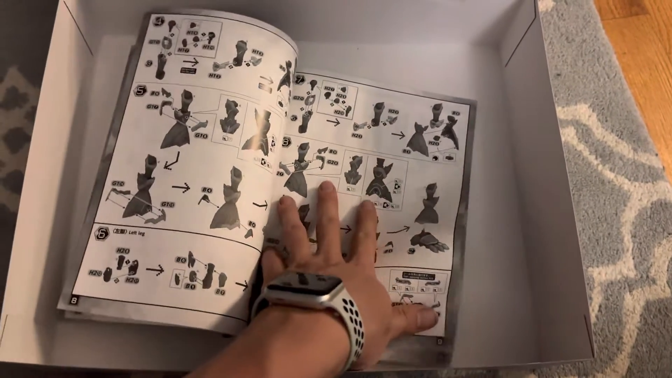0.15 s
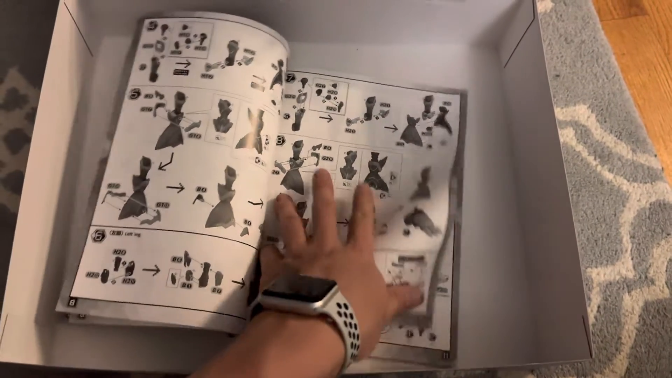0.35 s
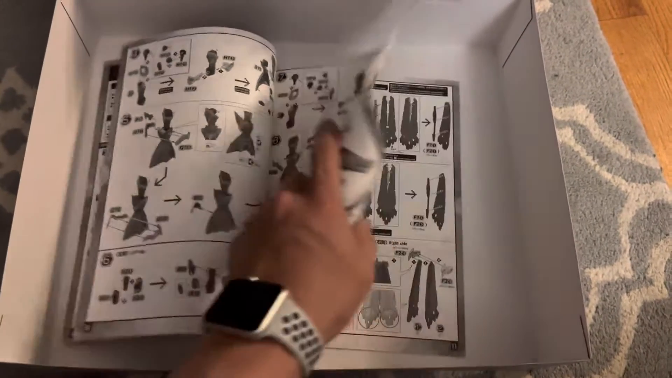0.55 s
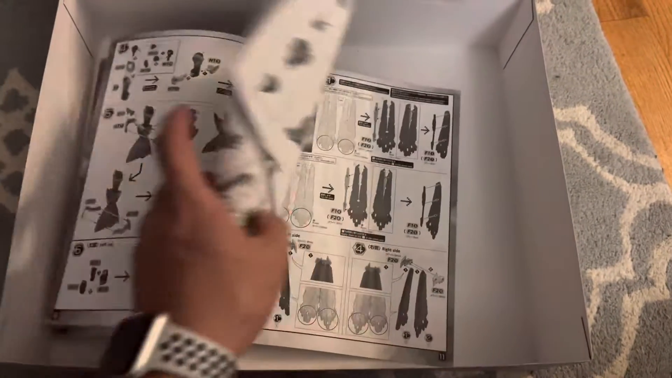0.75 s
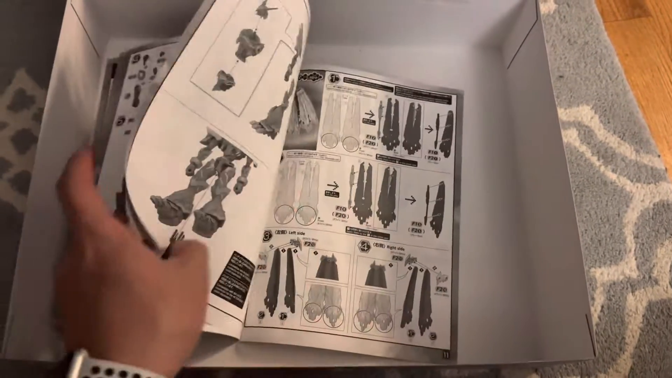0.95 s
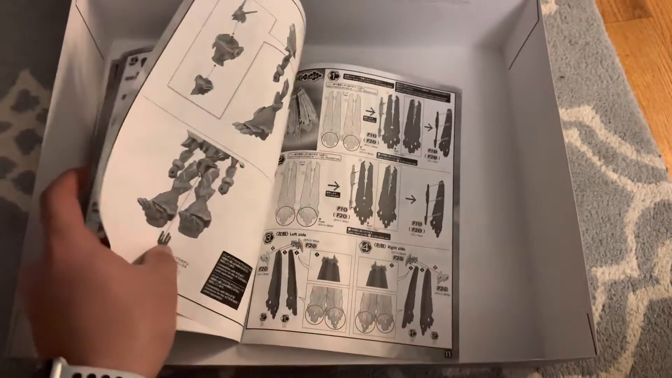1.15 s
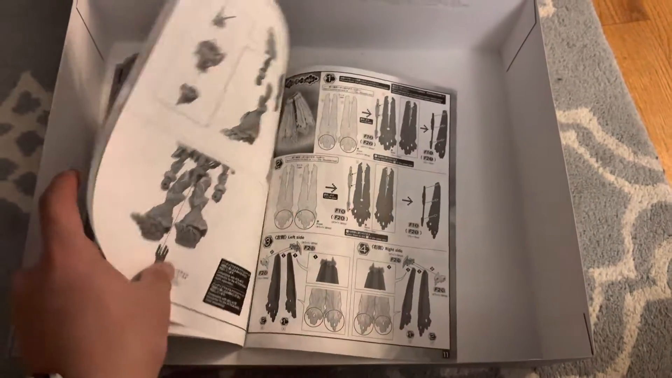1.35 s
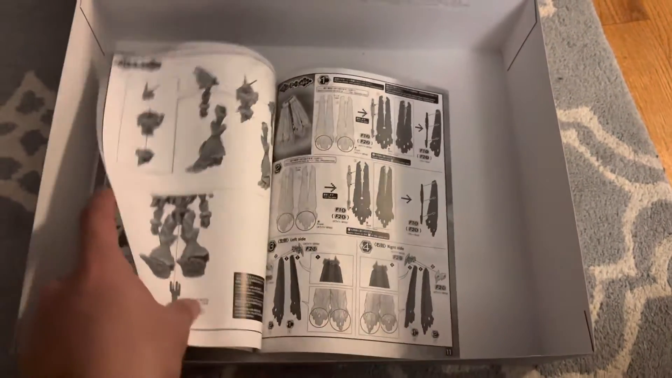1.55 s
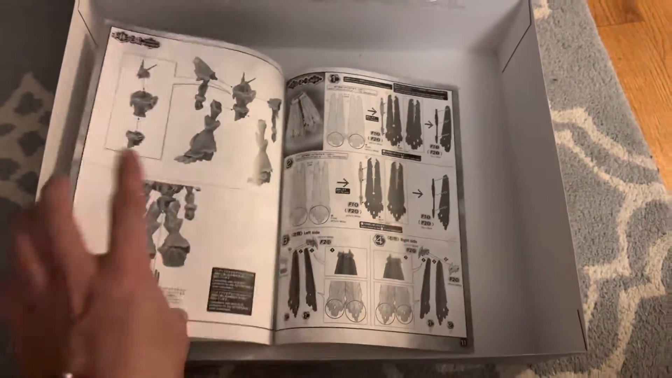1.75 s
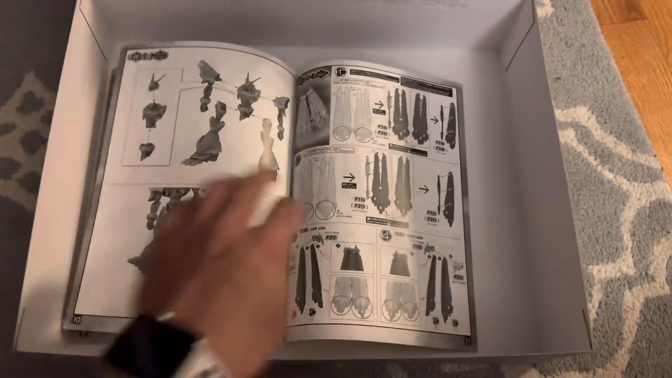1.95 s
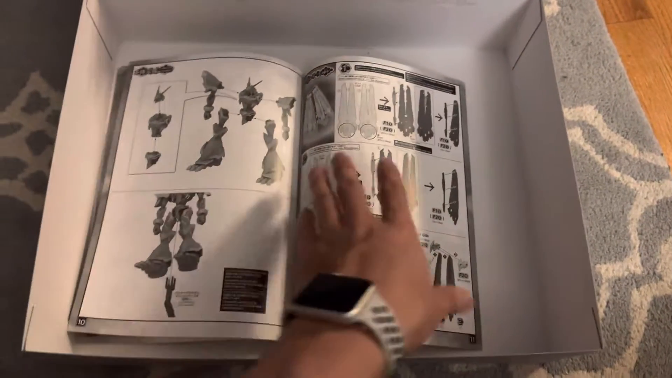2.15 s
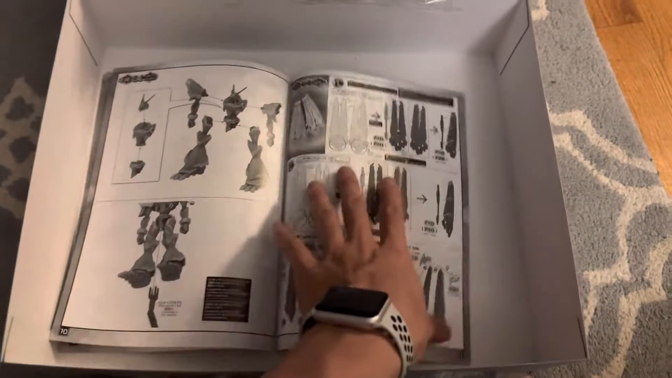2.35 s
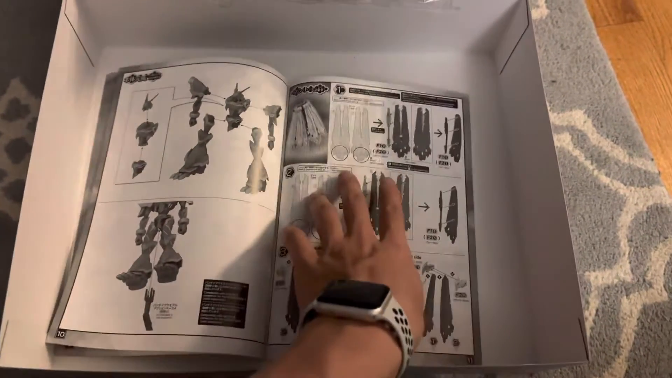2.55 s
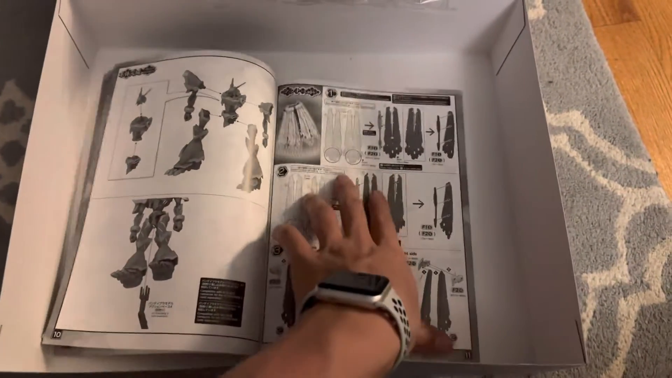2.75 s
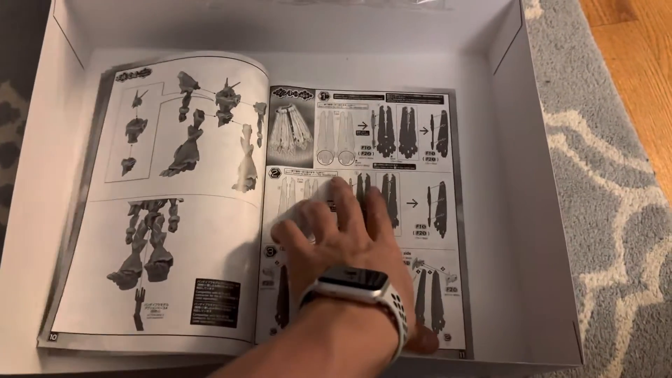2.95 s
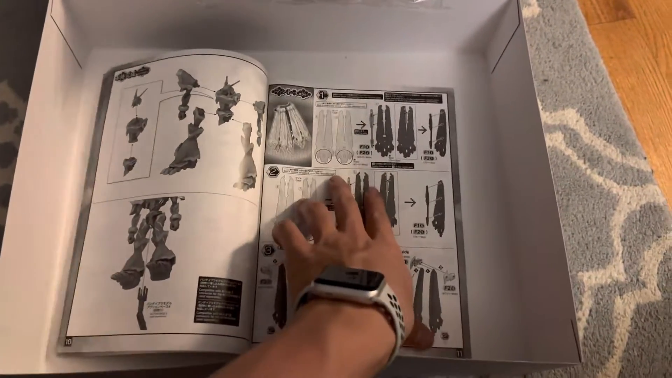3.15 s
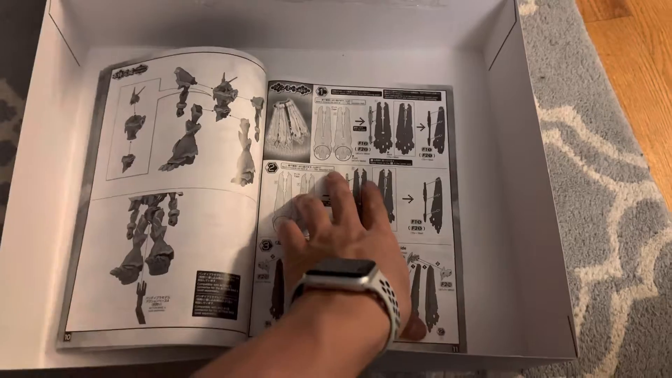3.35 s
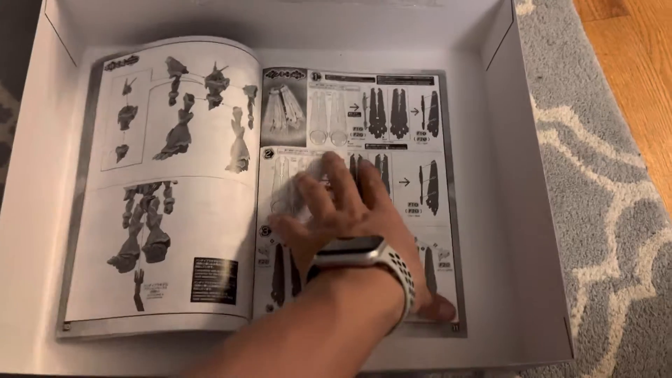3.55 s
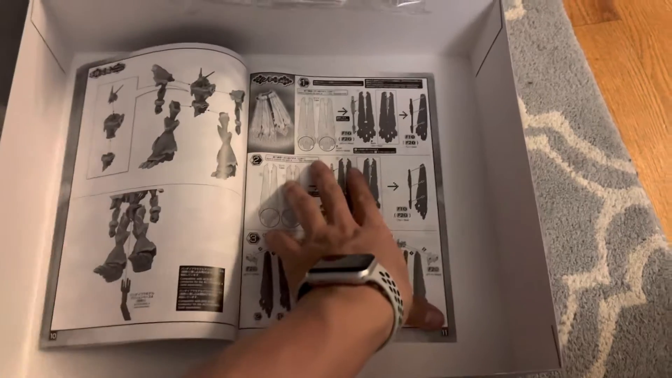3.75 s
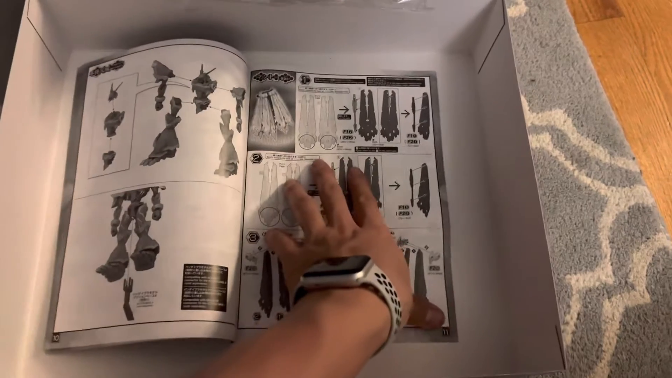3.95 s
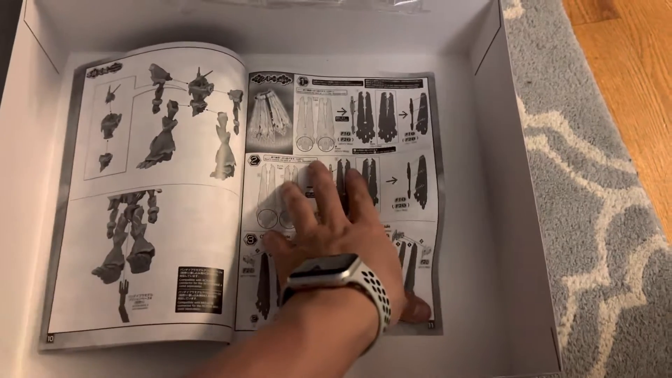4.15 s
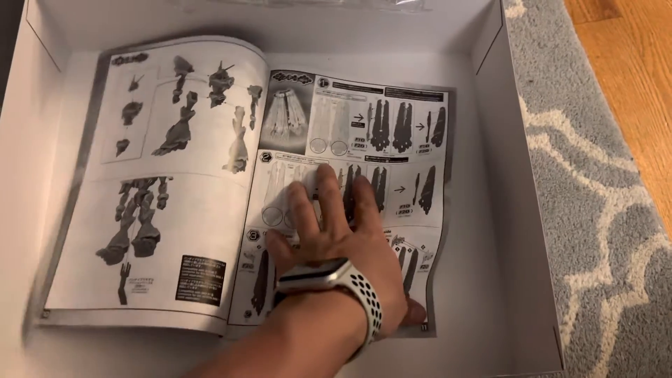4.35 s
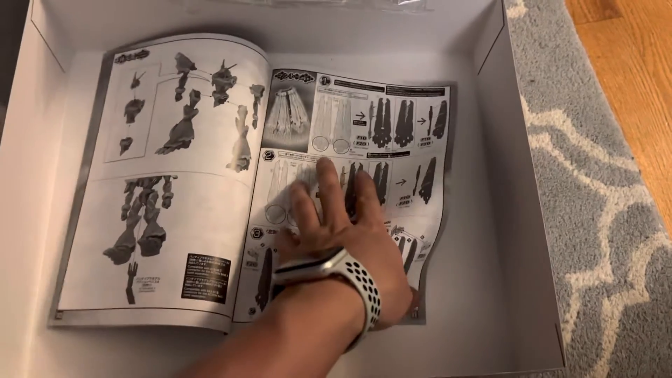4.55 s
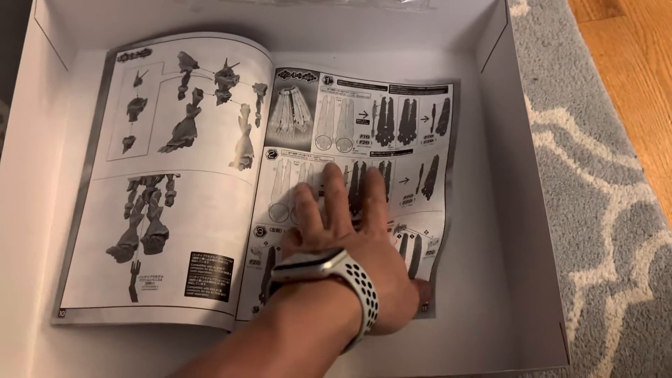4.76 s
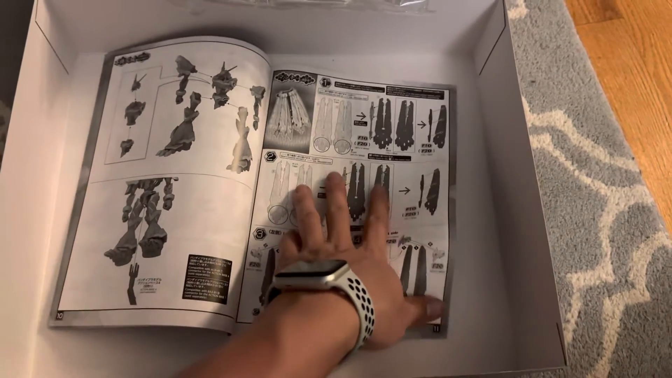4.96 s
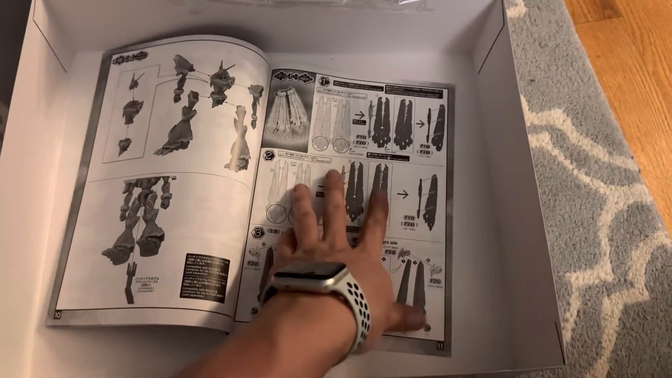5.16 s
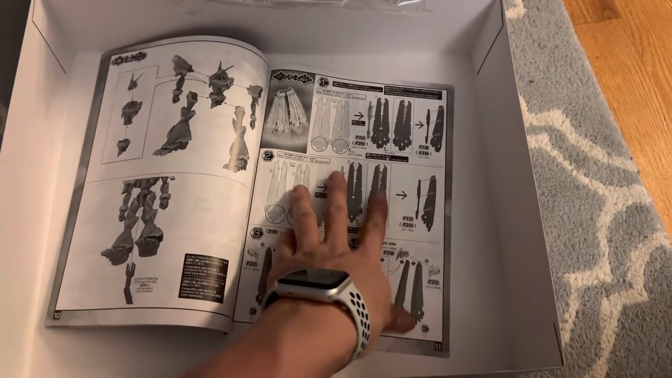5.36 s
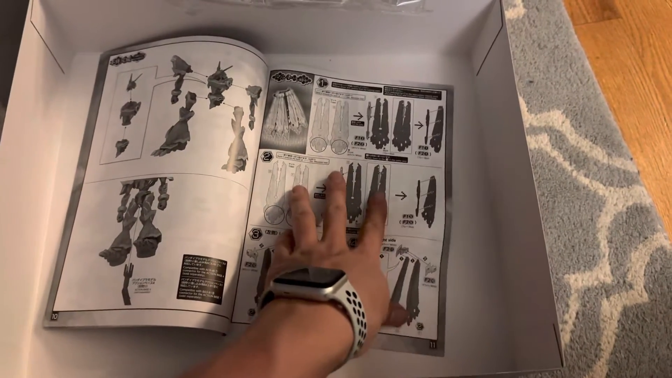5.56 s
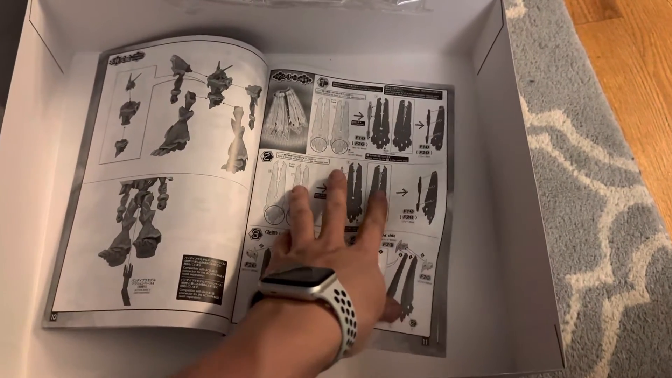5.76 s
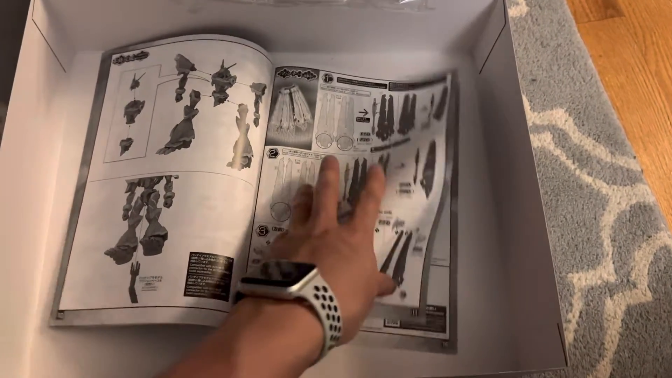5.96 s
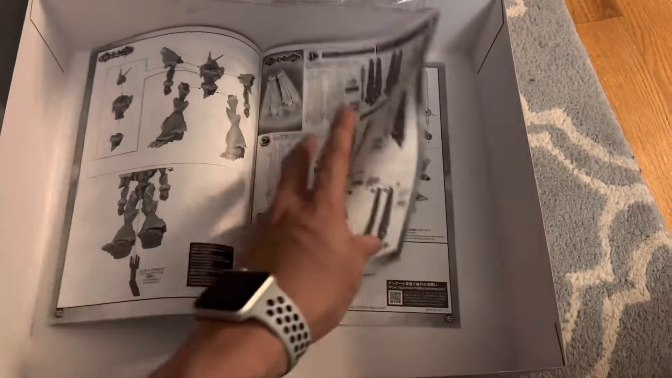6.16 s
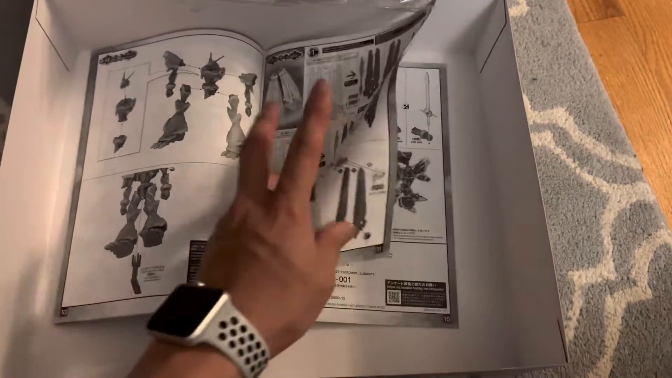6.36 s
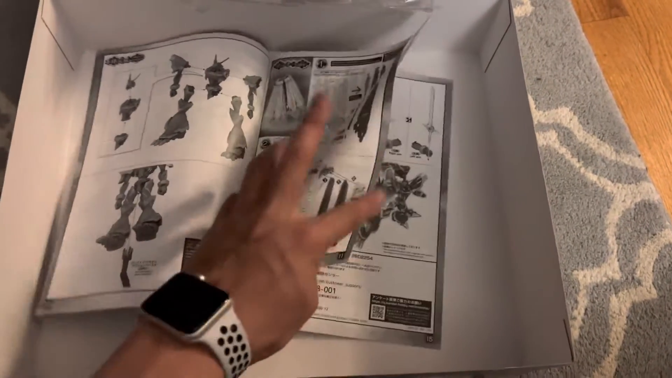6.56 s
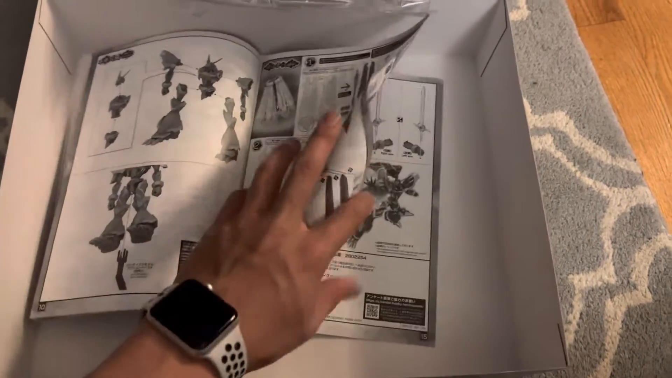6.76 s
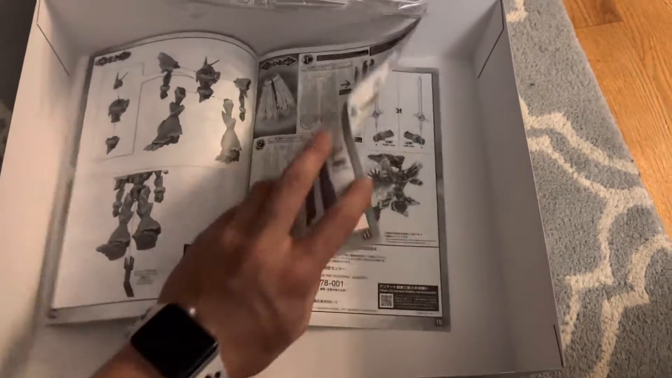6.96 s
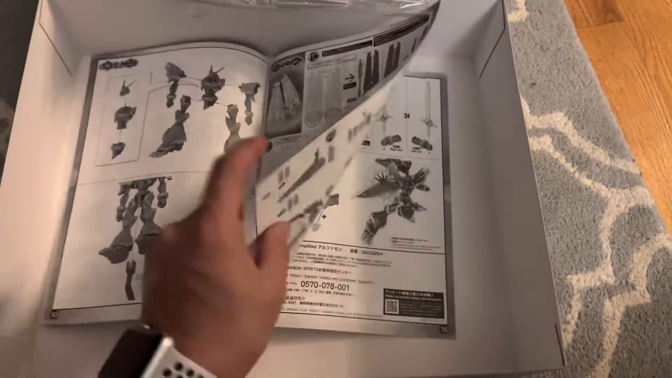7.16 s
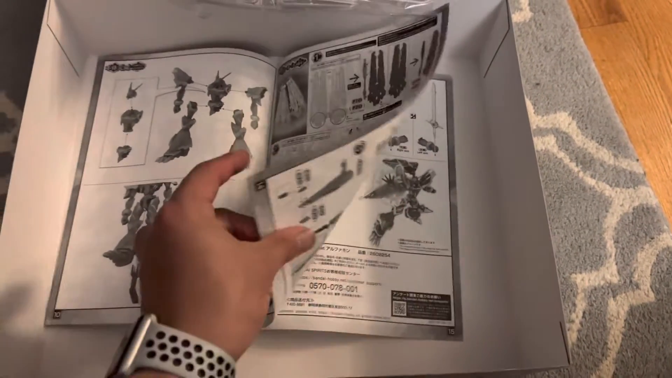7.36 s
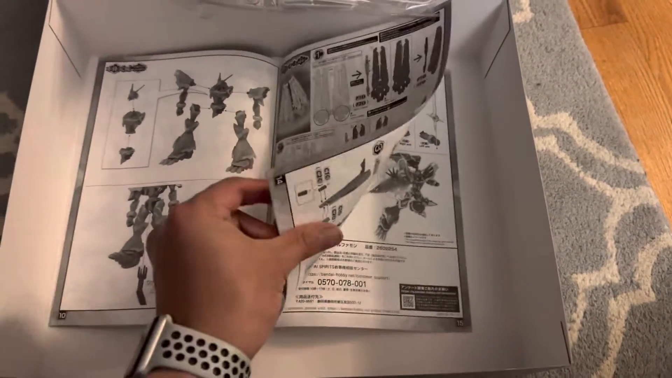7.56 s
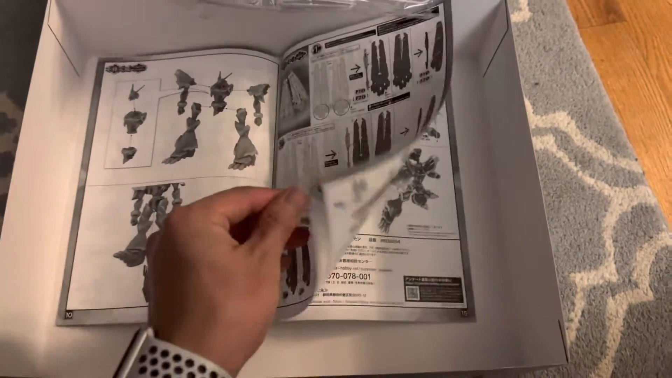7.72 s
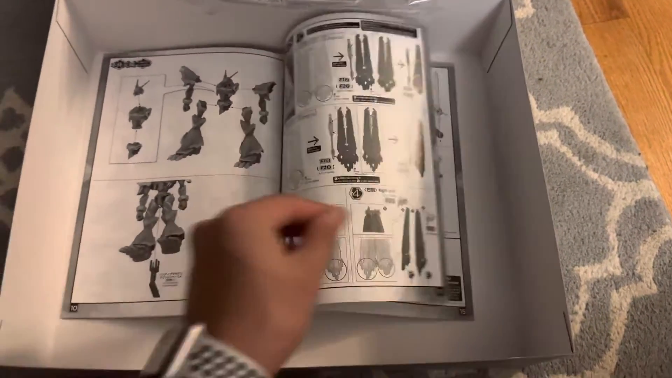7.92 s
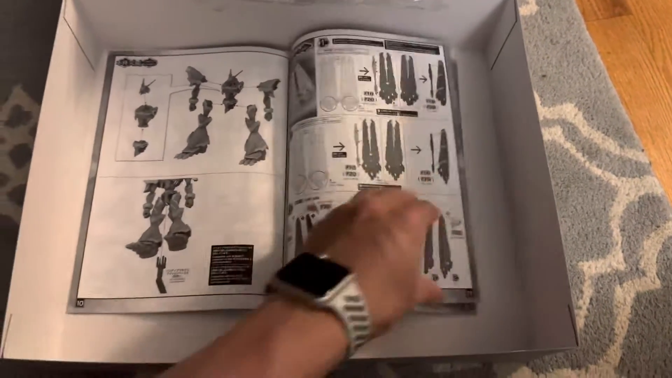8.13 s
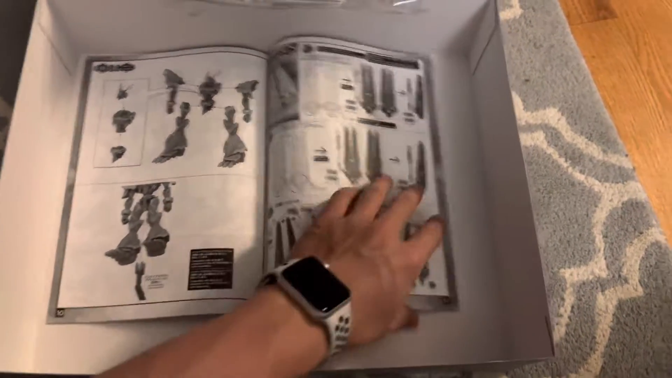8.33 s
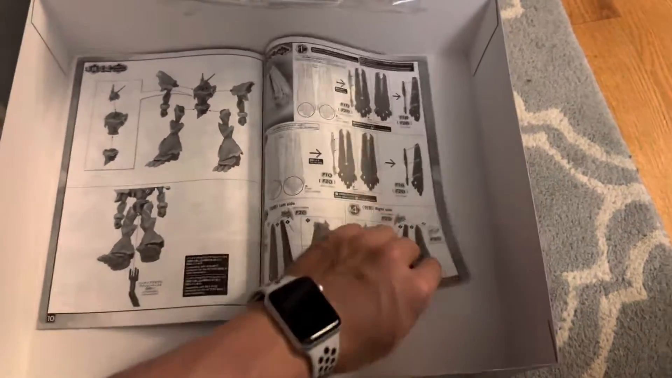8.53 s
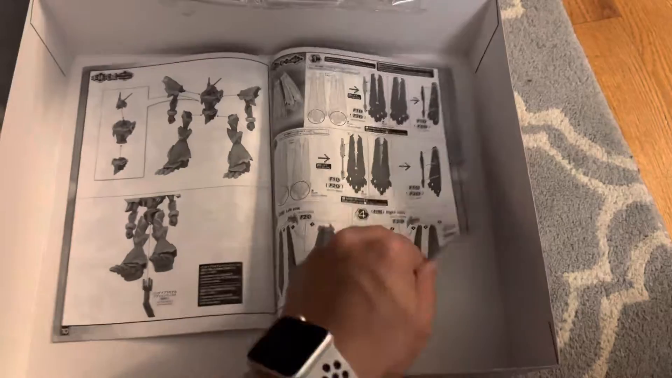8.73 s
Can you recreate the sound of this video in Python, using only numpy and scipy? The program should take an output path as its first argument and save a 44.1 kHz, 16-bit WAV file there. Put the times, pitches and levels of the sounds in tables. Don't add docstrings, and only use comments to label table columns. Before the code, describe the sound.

Close paper rustling indoors: brisk page turns, quiet rubbing and fingertip drumming, then sharp page flicks and box knocks over a faint room hum.

```python
import sys
import numpy as np
from scipy import signal
from scipy.fft import rfft, irfft
from scipy.io import wavfile
from scipy.ndimage import uniform_filter1d

SR = 44100
rng = np.random.default_rng(int(sys.argv[2]) if len(sys.argv) > 2 else 0)


def generate_wav(sig):
    pcm = np.round(np.clip(np.atleast_2d(sig).T, -1, 1) * 32767).astype(np.int16)
    wavfile.write(sys.argv[1], SR, pcm)


def to_linear_factor(level_db):
    exponent = np.asarray(level_db, float) / 20
    return 10 ** exponent


N = 392049
STEP = 32
FREQ = np.maximum(np.arange(N // 2 + 1) * SR / N, 1)
OPPOSITE = np.array([[1], [-1]])


def along(table, hz):
    points = np.array(table)
    return np.interp(np.log(hz), np.log(points[:, 0]), points[:, 1])


def colour(x, table):
    return irfft(rfft(x) * to_linear_factor(along(table, FREQ)), N)


def unit(x):
    return x / np.sqrt(np.mean(x ** 2))


def peak(x):
    return x / np.abs(x).max()


def ring(x, hz, width_hz):
    return signal.lfilter(*signal.iirpeak(hz, hz / width_hz, SR), x)


def steep(x, hz, width_hz):
    return ring(ring(x, hz, width_hz), hz, width_hz)


def walk(rate):
    hold = max(int(SR / STEP / rate), 2)
    levels = np.repeat(rng.standard_normal(N // STEP // hold + 2), hold)
    return uniform_filter1d(levels, hold)[:N // STEP + 1] * np.sqrt(3 / 2)


def swell(db):
    return uniform_filter1d(np.repeat(to_linear_factor(db), STEP), STEP)[:N]


def fade(t60_s, size, rise_s=0):
    t = np.arange(1, size + 1) / SR
    rise = np.minimum(t / max(rise_s, 1 / SR), 1) ** 2
    return rise * np.exp(-np.log(1000) * t / max(t60_s, .002))


def add(track, s, sound):
    i = int(s * SR)
    track[i:i + len(sound)] += sound[:N - i]


# f/Hz, level/dB
HOUSE_SPECTRUM = [(15, -73), (25, -13), (43, -2.5), (92, 5.5), (123, -10.5), (157, 0), (344, -30),
                  (2610, -52), (4740, -53), (5280, -53), (7400, -57), (8800, -65), (16000, -63)]
# f/Hz, width/Hz, level/dB
FLOOR_BANDS = [(87, 4.5, -77.5), (187, 10.4, -72), (6460, 810, -90)]


def house():
    rumble_db = -67
    mid = unit(colour(rng.standard_normal(N), HOUSE_SPECTRUM))
    side = unit(colour(rng.standard_normal(N), HOUSE_SPECTRUM))
    mid = swell(rumble_db + 2.8 * walk(3.27)) * mid
    for hz, width_hz, db in FLOOR_BANDS:
        wavering = swell(db + 1.7 * walk(2.2))
        mid = mid + wavering * unit(ring(rng.standard_normal(N), hz, width_hz))
    return to_linear_factor(.6 * OPPOSITE) * mid + to_linear_factor(rumble_db - 10.0) * side * OPPOSITE


def strokes(table, t):
    shoulder = 1.21
    power = 0
    for s, db, rise_s, fall_s in table:
        away = np.where(t < s, (s - t) / max(rise_s, .01), (t - s) / max(fall_s, .01))
        power = power + to_linear_factor(2 * db - 2 * 20 * away ** shoulder)
    return power


def stick_slip():
    chance, strength = rng.random((2, N // STEP + 1))
    jumps = (chance < 35 * STEP / SR) * 3.6 * strength
    slips = signal.lfilter([1], [1, -np.exp(-STEP / SR / 0.016)], jumps)
    return slips - slips.mean() + 1.25 * walk(140)


def fibre_ticks():
    sparse = rng.random(N) < 250 / SR
    size = to_linear_factor(np.minimum(3.5 * rng.exponential(size=N), 14))
    return sparse * size * np.sign(rng.standard_normal(N))


def held_time(now):
    held = now.copy()
    for row in CRACKLES + FLICKS + POPS + BUCKLES + TICKS + KNOCKS:
        start = row[0] - .022
        held[(now > start) & (now < row[0])] = start
    return held


# t/s of the peak, level/dB, rise/s, fall/s
RUBS = [(0.364, -53, 0.12, 0.14), (0.815, -40, 0.15, .06), (0.893, -42.5, 0.033, 0.06),
        (1.596, -46, 0.063, 0.041), (1.671, -51.5, 0.065, 0.32), (1.891, -58, 0.019, 0.074),
        (2.1, -74, 0.04, 0.06), (2.33, -67, 0.027, 0.08), (2.382, -57, 0.055, 0.046),
        (2.422, -61, 0.044, 0.042), (2.579, -58, 0.28, 0.072), (2.644, -58.5, 0.056, 0.48),
        (2.94, -54, 0.089, 0.1), (3.103, -57, 0.055, 0.042), (3.33, -66, 0.064, 0.11),
        (3.55, -56.5, 0.24, 0.19), (3.707, -61, 0.11, 0.099), (3.866, -62.5, 0.33, 0.074),
        (4.046, -56.5, 0.19, 0.11), (4.24, -60, 0.31, .08), (4.335, -51, 0.13, 0.078),
        (4.38, -47.5, 0.072, 0.03), (4.46, -69, 0.11, 0.08), (4.884, -61.5, 0.13, 0.07),
        (4.969, -66, 0.13, 0.1), (5.917, -59.5, 0.099, 0.23), (6.09, -55, 0.17, 0.12),
        (6.15, -57, 0.081, 0.019), (6.255, -56, 0.13, 0.047), (6.356, -63, 0.11, 0.063),
        (7.64, -63.5, 0.04, 0.045), (7.965, -57.5, 0.031, 0.065), (8.11, -78, 0.027, .08),
        (8.176, -65, 0.094, 0.068), (8.561, -58, 0.12, 0.13), (8.86, -49.5, 0.048, 0.2)]
# t/s of the peak, level/dB, rise/s, fall/s
SCRAPES = [(0.025, -63, 0.03, 0.051), (0.16, -47.5, 0.061, 0.075), (0.659, -48, 0.08, 0.02),
           (1.053, -51, 0.057, 0.068), (1.122, -49.5, 0.044, 0.051), (1.192, -58.5, 0.061, 0.13),
           (1.467, -51, 0.21, 0.11), (3.44, -53.5, 0.047, 0.047), (3.637, -56, 0.039, 0.095),
           (4.545, -63, 0.13, 0.21), (5.049, -69.5, 0.074, 0.037), (5.253, -76, 0.064, 0.062),
           (5.547, -64.5, 0.12, 0.12), (5.79, -60, 0.11, 0.15), (6.52, -59.5, 0.12, 0.15),
           (6.67, -61, 0.059, 0.1), (6.82, -63, 0.024, 0.079), (6.962, -46, 0.064, 0.036),
           (7.678, -60, 0.047, 0.049), (7.757, -66.5, 0.074, 0.064), (7.842, -55.5, 0.013, 0.12),
           (8.246, -55.5, 0.02, 0.083), (8.351, -45, 0.045, 0.062), (8.67, -55, 0.15, 0.096),
           (8.72, -70, .06, .08), (8.77, -57.5, 0.035, 0.23)]
# t/s of the peak, level/dB, rise/s, fall/s
DRAGS = [
    (0.29, -53.5, 0.084, 0.31),
    (0.705, -39.5, 0.033, 0.05),
    (0.858, -38.5, 0.27, 0.014),
    (1.35, -58, 0.03, 0.51),
    (1.93, -58, 0.062, 0.13),
    (2.03, -73.5, 0.1, 0.13),
    (5.67, -66.5, 0.19, 0.48),
    (7.03, -54, 0.095, 0.17),
    (7.3, -63, 0.87, 0.55),
    (8.43, -52.5, 0.083, 0.16),
]
# t/s of the peak, level/dB, rise/s, fall/s
FLEXES = [(0.045, -58.5, 0.063, 0.049), (0.2, -76, 0.079, 0.32), (0.7, -60, 0.04, 0.27),
          (0.71, -44.5, 0.028, 0.044), (0.76, -52.5, 0.073, 0.089), (0.9, -52, 0.044, 0.21),
          (1.1, -57, 0.23, 0.24), (1.44, -57.5, 0.15, 0.034), (1.578, -52.5, 0.02, 0.023),
          (1.76, -53, 0.2, 0.12), (1.97, -67.5, 0.15, 0.11), (2.1, -69, 0.025, 0.05),
          (2.4, -59.5, 0.11, 0.27), (2.68, -61.5, 0.11, 0.14), (3.11, -55, 0.056, 0.066),
          (3.28, -62, 0.18, 0.1), (3.35, -74, .06, 0.092), (3.46, -51, 0.069, 0.11),
          (3.95, -71.5, 0.18, 0.9), (4.38, -66.5, 0.056, 0.25), (5.05, -69, 0.47, 0.2),
          (5.5, -69, 0.32, 0.041), (6.13, -61, 0.18, 0.17), (6.235, -64, 0.053, 0.2),
          (6.51, -66.5, 0.076, 0.39), (7.04, -52, 0.24, 0.17), (7.3, -65.5, 0.41, 0.44),
          (7.57, -66, 0.11, 0.78), (7.87, -50, 0.063, 0.14), (8.23, -58, 0.12, 0.088),
          (8.37, -47.5, 0.049, 0.1), (8.67, -50, 0.1, 0.12)]
SLIDE_HZ = [6200, 2700, 1120, 420]
# hiss level/dB, edge scrape level/dB, sheet flex level/dB, flap level/dB
RUB_COLOUR = (0, -1, -12, -12.5)
SCRAPE_COLOUR = (-0.5, 2.5, -7, -7.5)
DRAG_COLOUR = (-1, -1.5, -8, -13.5)
FLEX_COLOUR = (-32, -11, -2, -1.5)
RESTING_COLOUR = (-99, -79.5, -98, -84)
# f/Hz, level/dB
SHEET = [(50, -10.5), (110, -7), (180, -3), (280, 0.5), (1200, 3.5), (1500, 0.5), (2050, -1.5), (3400, 1),
         (4000, -3), (7000, -1.5), (9000, 2), (16000, 2)]
# f/Hz, share 0-1
SPREAD = [(100, 0), (500, 0.37), (1200, 0.7), (2500, 0.76), (4500, 1), (6500, 0.8), (8500, 0.2),
          (16000, 0.34)]
# f/Hz, dB per dB
AIR = [(5000, 0.0024), (8000, 0.041), (13000, 0.21)]


def slide():
    grip = stick_slip()
    ticks = fibre_ticks()
    now = np.arange(N // STEP + 1) * STEP / SR
    held = held_time(now)
    power = to_linear_factor(np.array(RESTING_COLOUR))[:, None] ** 2
    for table, bands_db in [(RUBS, RUB_COLOUR), (SCRAPES, SCRAPE_COLOUR),
                            (DRAGS, DRAG_COLOUR), (FLEXES, FLEX_COLOUR)]:
        power = power + to_linear_factor(np.array(bands_db))[:, None] ** 2 * strokes(table, now)
    rows = 10 * np.log10(power)[::-1]
    out, near = 0, walk(4.9)
    for hz in 45 * 2 ** np.arange(0, 8.5, .4):
        place = np.interp(np.log(hz), np.log(SLIDE_HZ[::-1]), np.arange(4))
        low = min(int(place), 2)
        curve = rows[low] + (place - low) * (rows[low + 1] - rows[low])
        db = np.minimum(curve, np.interp(held, now, curve))
        db = db + along(AIR, hz) * (np.clip(db + 56, -12, 3) + 5 * walk(8.3))
        near = .85 * near + np.sqrt(1 - .85 ** 2) * walk(12)
        patches = 1.07 * near + 2.63 * walk(30) + 2.64 * walk(5.5)
        db = db + along(SHEET, hz) + grip + patches - 8.0
        share = np.clip(along(SPREAD, hz), 0, 1)
        noise = rng.standard_normal((2, N)) + [[1.5], [0]] * ticks
        mid, side = unit(steep(noise, hz, hz / 2.13))
        out = out + swell(db) * (mid + share * side * OPPOSITE) / np.sqrt(1 + share ** 2)
    return out


# t/s, peak level/dB, ring f/Hz, t60/s
TAPS = [(0.038, -47, 335, 0.094), (2.315, -62, 180, 0.04), (2.387, -50, 232, 0.047),
        (2.429, -53, 218.6, 0.019), (3.098, -44, 311, 0.15), (3.119, -40.5, 440, 0.029),
        (3.204, -39, 367, 0.027), (3.234, -42, 390, 0.014), (3.256, -42, 420, 0.023),
        (3.274, -42, 366, 0.047), (3.291, -43.5, 366, 0.055), (3.917, -46.5, 177, 0.065),
        (4.402, -50, 560, .03), (4.57, -52, 440, 0.03), (5.385, -47, 364, 0.054),
        (5.419, -41.5, 342, 0.036), (5.44, -42.5, 392, 0.035), (6.494, -50.5, 419, 0.14)]
# t/s, peak level/dB, ring f/Hz, t60/s
FLOPS = [
    (1.748, -40, 422, 0.13),
    (1.749, -41, 892, .08),
    (1.753, -44, 187, 0.084),
    (1.772, -36.5, 172, 0.14),
    (1.803, -47, 168, 0.07),
    (6.128, -45.5, 137, 0.18),
    (6.89, -37, 300, 0.045),
]


def taps():
    out, t = np.zeros(N), np.arange(8192) / SR
    for s, peak_db, hz, t60_s in TAPS + FLOPS:
        over = 0.45 * np.sin(2 * np.pi * 1200 * t) + 0.19 * np.sin(2 * np.pi * 2150 * t)
        note = np.sin(2 * np.pi * hz * t) + over * fade(0.025, size=8192)
        note = peak(note * fade(t60_s, size=8192, rise_s=0.0019))
        tick = ring(rng.standard_normal(8192), 5000, 8700) * fade(0.017, size=8192, rise_s=0.00058)
        add(out, s, to_linear_factor(peak_db) * (note + 0.27 * tick))
    return out


# t/s of the peak, level/dB, centre f/Hz, length/s
ZIPS = [(0.045, -59, 1300, .03), (0.235, -60, 1320, 0.026), (0.912, -45, 1260, 0.031),
        (6.239, -58, 503, 0.039), (4.324, -59, 1150, 0.031), (1.19, -52, 1200, .015),
        (2.956, -62.5, 3000, .05), (0.142, -48, 3300, 0.036), (0.299, -57, 3150, 0.073),
        (0.724, -43.5, 5860, 0.022), (0.74, -48, 3420, 0.032), (0.765, -33, 3330, 0.0038),
        (0.762, -35.5, 5940, 0.0038), (0.789, -39, 6050, 0.011), (0.808, -37, 7070, 0.012),
        (0.823, -36.5, 7260, 0.0082), (0.85, -42, 1950, .02), (0.849, -38, 5450, 0.012),
        (0.893, -39, 6030, 0.01), (1.412, -50, 2970, 0.024), (1.431, -44.5, 1430, 0.047),
        (1.43, -55.5, 4970, 0.048), (1.189, -53.5, 2460, 0.011), (2.941, -61.5, 3500, 0.073),
        (3.028, -59, 5000, 0.0093), (3.638, -65, 2820, 0.028), (6.957, -44, 2980, 0.013),
        (6.963, -33.5, 2830, 0.006), (6.967, -40, 7000, 0.0052), (6.971, -36.5, 2300, 0.0059),
        (6.979, -43.5, 2560, 0.021), (7.002, -50, 2430, 0.027), (7.035, -51, 800, 0.01),
        (7.046, -42.5, 1230, 0.014), (7.057, -47.5, 1600, .01), (7.075, -52.5, 1410, .02),
        (7.025, -51, 350, .02), (7.046, -55.5, 3040, .03), (7.092, -58, 780, .03),
        (7.281, -69, 1280, 0.086), (7.893, -42.5, 1100, 0.031), (7.912, -47.5, 900, .025),
        (7.687, -48, 900, .02), (8.395, -53, 1120, 0.036), (6.08, -60, 3460, 0.058),
        (8.045, -76, 1355, 0.099), (8.245, -55, 9100, 0.0088), (8.274, -54.5, 6100, 0.0089),
        (8.63, -51, 1030, 0.019), (8.679, -65, 8500, 0.032), (8.862, -55, 7950, 0.051),
        (8.348, -44.5, 8850, 0.02), (8.517, -54.5, 4100, 0.0074)]
# t/s of the peak, level/dB, centre f/Hz, length/s
SQUEAKS = [
    (2.513, -67, 3800, .03),
    (2.596, -72, 3770, .025),
    (2.765, -65, 4500, 0.05),
    (3.552, -60, 4400, 0.05),
    (3.85, -67.5, 4500, .1),
    (3.851, -71, 3230, .1),
    (5.55, -68, 2100, .05),
    (5.668, -82, 4000, .08),
]


def zips():
    out = np.zeros(N)
    for (s, db, hz, length_s), width in [(row, 0.43) for row in ZIPS] + [(row, 0.11) for row in SQUEAKS]:
        half = int(1.5 * length_s * SR)
        t = np.arange(-half, half) / SR
        grit = rng.standard_normal(size=16384) * to_linear_factor(np.minimum(4.0 * rng.exponential(size=16384), 9))
        hiss = unit(steep(grit, hz, width * hz)[2048:2048 + len(t)])
        band = hiss * swell(db + 2.1 * walk(90))[:len(t)]
        add(out, s + t[0], band * np.exp(-(2 * t / length_s) ** 2))
    return out


# t/s, peak level/dB, sheet ring f/Hz, bite level/dB
TICKS = [(0.16, -27.5, 1300, -12), (0.657, -38.5, 596, -1), (0.693, -42, 1200, 7), (0.62, -54, 1630, 6),
         (0.64, -42, 3800, -3), (0.348, -49, 1110, -9), (0.445, -49, 1800, 0), (2.311, -58, 890, -5),
         (2.415, -51, 900, -6), (4.076, -53, 496, -12), (4.548, -49, 876, -6), (4.63, -55, 1210, -6),
         (4.76, -61, 500, -8), (5.045, -69, 2000, -1), (5.252, -60, 1480, -6), (0.743, -47, 1200, -2),
         (0.858, -40, 2500, 2), (7.669, -46, 1090, -8), (1.408, -44, 1400, 0), (7.029, -43, 1180, -2),
         (6.108, -49, 980, -16), (6.211, -50, 705, 0), (6.961, -42.5, 2840, 9), (7.483, -54, 790, -7),
         (7.526, -55, 1190, -6), (7.536, -39.5, 1290, -10.5), (7.563, -47.5, 1190, -18),
         (7.252, -50.5, 597, -14), (8.096, -63, 700, -3), (8.493, -51, 1500, -2), (8.877, -45, 1280, -1)]
CRACKLES = [(0.653, -31.5, 688, 5), (0.7625, -41, 577, 10), (0.888, -39, 1260, 11), (1.335, -39, 1180, 0.5),
            (1.447, -31.5, 1230, -10), (1.461, -38, 1140, 11.5), (1.571, -40, 404, 4.5),
            (1.596, -48, 577, 14), (6.81, -62, 755, 18), (6.945, -50.5, 1210, 17),
            (7.755, -50.5, 1390, 0.5)]
FLICKS = [
    (1.05, -42, 1250, -4),
    (1.125, -42, 1190, -3),
    (6.662, -39, 1167, 3),
    (7.675, -35.5, 864, 2.5),
    (7.839, -22, 1380, 3),
    (8.194, -41, 423, -7),
    (8.511, -40.5, 1300, -2),
]
POPS = [(1.746, -37, 910, -9), (3.367, -45, 900, -5.5), (3.916, -50, 1030, -18), (4.379, -32.5, 664, -20.5),
        (6.13, -39, 298, -25), (7.613, -45.5, 1190, -13), (7.95, -44, 384, -6), (8.132, -50, 635, -18),
        (8.234, -44.5, 520, -8), (8.349, -17, 1200, -36), (8.646, -40, 593, -17)]
BUCKLES = [
    (0.1674, -34, 876, -14),
    (0.699, -44, 600, -10),
    (2.675, -37.5, 573, -19),
    (3.086, -41, 443, -15),
    (5.072, -46.5, 500, -25),
    (7.884, -42, 1210, -16),
]
# edge click level/dB, bright crack level/dB, tail/s
TICK = (0, -5.5, 0.046)
CRACKLE = (-5, 0, 0.097)
FLICK = (0, -15, 0.1)
POP = (0, -1, 0.062)
BUCKLE = (0, -1, 0.14)
SNAP_KINDS = [(TICKS, TICK), (CRACKLES, CRACKLE), (FLICKS, FLICK), (POPS, POP), (BUCKLES, BUCKLE)]


def snap(hz, bite_db, edge_db, bright_db, tail_s):
    envelope = 0.62 * fade(0.012, size=8192, rise_s=0.0011) + 0.25 * fade(tail_s, size=8192, rise_s=0.0014)
    burst = rng.standard_normal((3, 8192)) * envelope
    burst[:, int(.0012 * SR)] += 3.0
    burst[:, int(.002 * SR)] += 4.0
    sheet = peak(steep(burst[0], hz, 0.84 * hz))
    sheet = sheet + 0.1 * peak(ring(steep(burst[0], hz, hz), hz, 0.07 * hz))
    sheet = sheet + 0.33 * peak(steep(burst[0], 482, 310))
    edge = peak(steep(burst[1], 2050, 1400))
    crack = peak(steep(burst[2], 6500, 6000))
    return peak(sheet) + to_linear_factor(bite_db + edge_db) * edge + to_linear_factor(bite_db + bright_db) * crack


def snaps():
    out = np.zeros(N)
    for rows, (edge_db, bright_db, tail_s) in SNAP_KINDS:
        for s, peak_db, hz, bite_db in rows:
            add(out, s, to_linear_factor(peak_db) * snap(hz, bite_db, edge_db, bright_db, tail_s))
    return out


# f/Hz, level/dB, t60/s
BOX_MODES = [(223.4, -2.5, 0.17), (440, -11, 0.15), (622, -0.5, 0.14), (945, -22.5, 0.13),
             (1300, -5.5, 0.065), (1425, -16.5, 0.16), (1790, -28, 0.1), (1890, -51, 0.3),
             (2376, -15, 0.11)]


def box(blow):
    out = 0
    for hz, db, t60 in BOX_MODES:
        a, b = rng.standard_normal(2)
        mode = ring(blow, hz * (1 + 0.003 * b), np.log(1000) / np.pi / t60)
        out = out + to_linear_factor(db + 2.4 * a) * np.sign(b) * mode * t60 * 600
    return out


# t/s, peak level/dB, softness/ms, low thump level/dB, ring share 0-1
KNOCKS = [
    (3.422, -20, 0.24, -13, 0.75),
    (6.888, -46, 0.89, -20, 0.9),
    (7.115, -35, 0.61, -11, 0.76),
    (8.647, -45, 0.94, -1, 1),
    (8.659, -21.5, 0.28, -5, 0.51),
]


def knocks():
    out = np.zeros(N)
    for s, peak_db, soft_ms, thump_db, share in KNOCKS:
        blow = np.zeros(16384)
        push = np.hanning(int(max(soft_ms, .1) * SR / 1000) + 3)
        add(blow, 0, 0.031 * push)
        add(blow, .003, push)
        thump = np.sin(2 * np.pi * 126 * np.arange(16384) / SR) * fade(0.087, size=16384, rise_s=0.0091)
        rattle = rng.standard_normal(16384) * fade(0.02, size=16384, rise_s=0.0021)
        scatter = peak(steep(rattle, 1290, 300) + 0.18 * steep(rattle, 2020, 500))
        blend = share * peak(box(blow)) + (1 - share) * scatter
        add(out, s, to_linear_factor(peak_db) * (blend + to_linear_factor(thump_db) * thump))
    return out


# t/s, peak level/dB, start f/Hz, end f/Hz, t60/s
PUFFS = [
    (6.121, -36.5, 717, 170, 0.11),
    (7.952, -50, 450, 150, 0.074),
    (8.196, -49, 600, 200, 0.039),
    (8.353, -33, 700, 198, 0.046),
]


def puffs():
    out, t = np.zeros(N), np.arange(8192) / SR
    sag_s = .006
    for s, peak_db, start_hz, end_hz, t60_s in PUFFS:
        hz = end_hz + (start_hz - end_hz) * np.exp(-t / sag_s)
        note = np.sin(2 * np.pi * np.cumsum(hz) / SR)
        add(out, s, to_linear_factor(peak_db) * peak(note * fade(t60_s, size=8192, rise_s=0.0011)))
    return out


# delay/s, share
GAPS = [(.00039, -0.14), (.0011, 0.13)]


def gap_echo(x):
    out, treble = x, ring(x, 7000, 8000)
    now = np.arange(N)
    for gap_s, share in GAPS:
        gap = uniform_filter1d(np.repeat(gap_s * to_linear_factor(.5 * walk(4)), STEP)[:N], STEP)
        late = now - gap * SR
        out = out + share * np.array([np.interp(late, now, port) for port in treble])
    return out


# f/Hz, echo level/dB
WALLS = [(100, -31), (500, -20.5), (1500, -11), (4000, -8), (8000, -6.5), (16000, -31)]


def wall_echo(paper):
    echo = rng.standard_normal((2, 16384)) * (fade(0.092, size=16384) + 0.16 * fade(0.49, size=16384))
    echo = echo / np.sqrt(np.sum(echo ** 2, axis=1, keepdims=True))
    walls = signal.fftconvolve(colour(paper, WALLS), echo, axes=1)[:, :N]
    return walls * to_linear_factor(1.8 * OPPOSITE)


# f/Hz, phase/rad
PORT_PHASE = [(0, 0), (1120, 0.3), (1550, 2.1), (1890, 0.1), (2330, 2.0), (3010, -0.0), (3270, 1.2),
              (3790, 0.3), (7410, 0.9), (8530, -0.0), (10200, -2.8), (12300, -3.3), (13300, -6.1),
              (15900, -6.6)]
# f/Hz, level/dB
PORT_DB = [(60, 1.0), (110, 1.0), (200, 2.5), (380, 1.0), (700, 3.5), (1290, 2.5), (2380, 1.5), (4400, 4.0),
           (8120, 1.0), (15000, 0.0)]


def scene():
    paper = gap_echo(slide()) + zips() + snaps() + taps() + knocks() + puffs()
    tilt = to_linear_factor(along(PORT_DB, FREQ) / 2) * np.exp(.5j * along(PORT_PHASE, FREQ))
    direct = irfft(rfft(paper) * np.array([tilt, 1 / tilt]), N)
    return direct + wall_echo(paper) + house()


def band_limit(x):
    return signal.sosfilt(signal.butter(12, 16400, fs=SR, output="sos"), x)


# f/Hz, level/dB
MIC = [(20, -19), (45, 4), (8800, 3), (9800, 1.5), (11000, -24), (12300, -10.5), (13500, -10),
       (15500, -3.5)]
# f/Hz, level/dB
TOP = [(15750, 0), (15900, -80)]


def record(dry):
    heard = colour(colour(dry, MIC), TOP)
    return band_limit(heard)


dry = scene()
out = record(dry)
generate_wav(out)
```